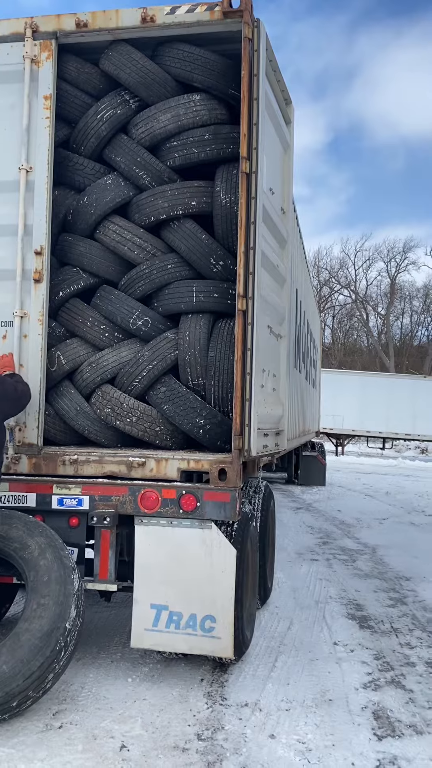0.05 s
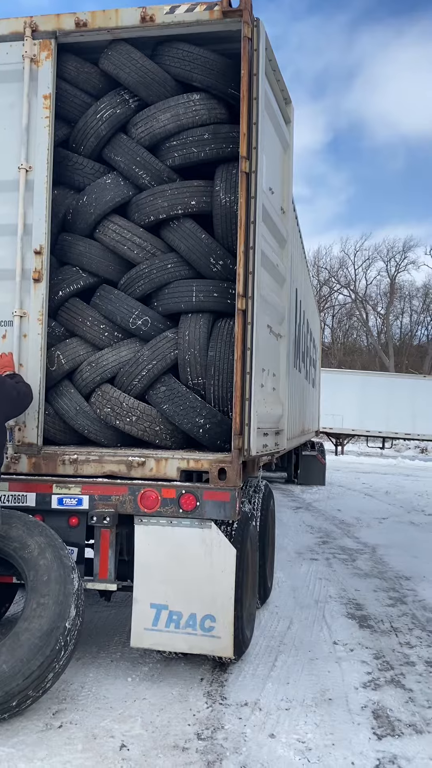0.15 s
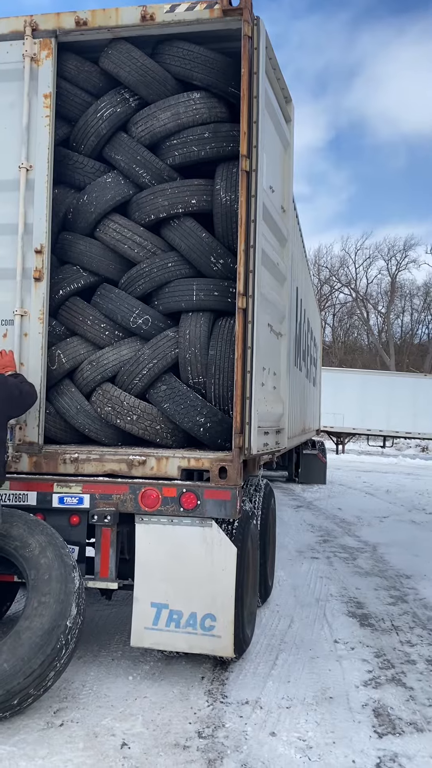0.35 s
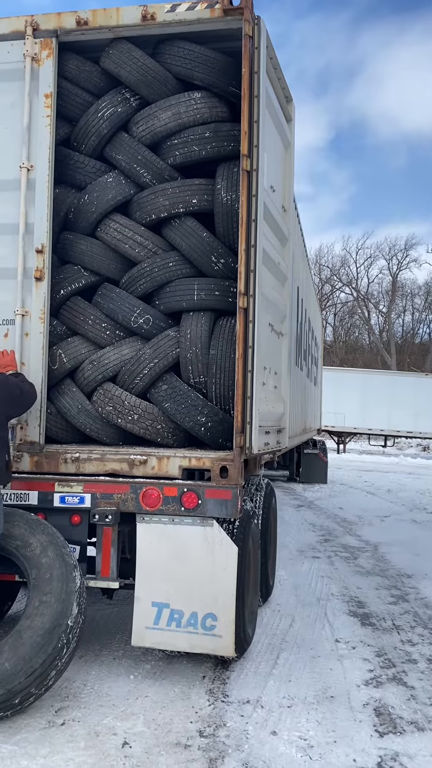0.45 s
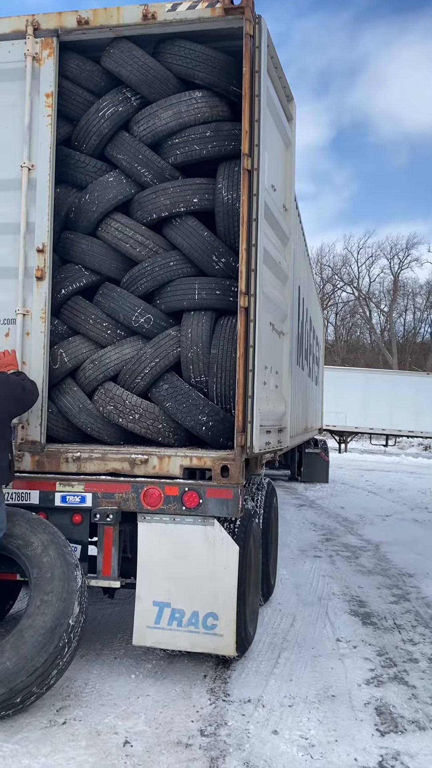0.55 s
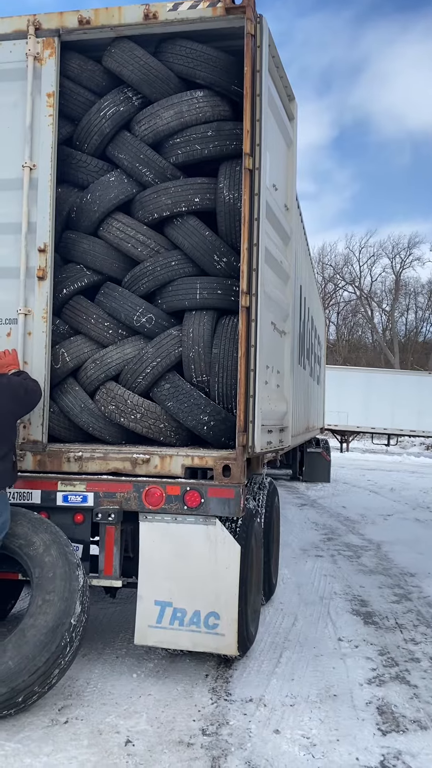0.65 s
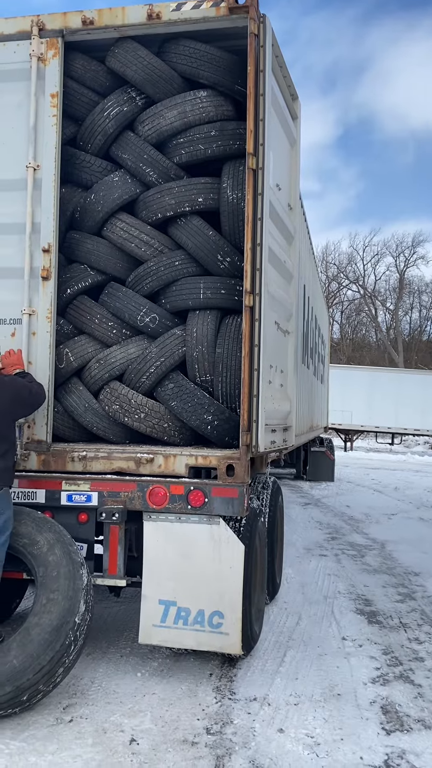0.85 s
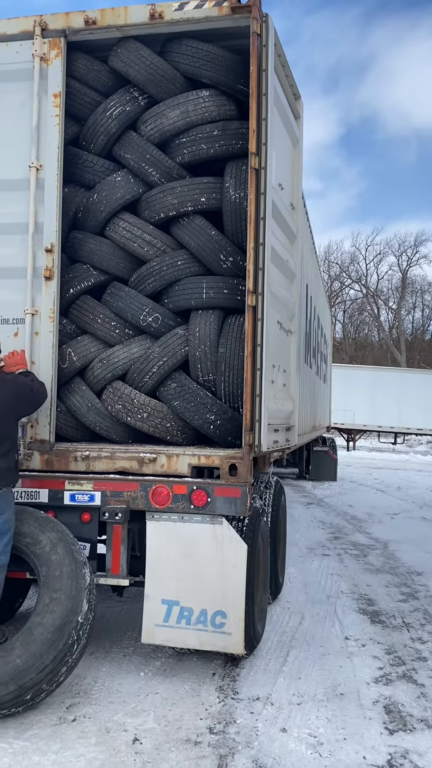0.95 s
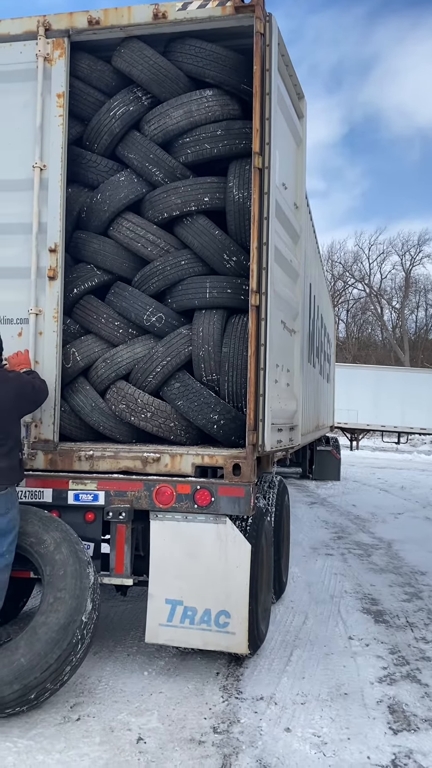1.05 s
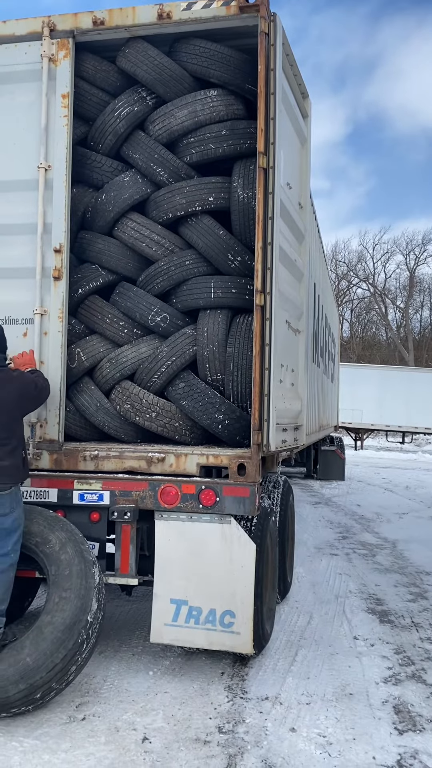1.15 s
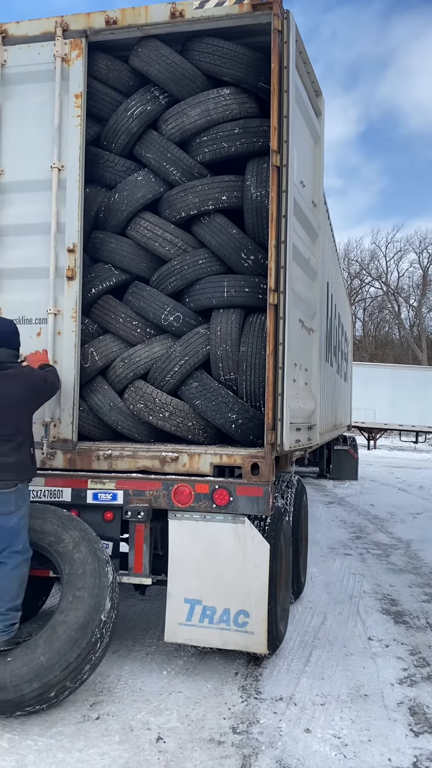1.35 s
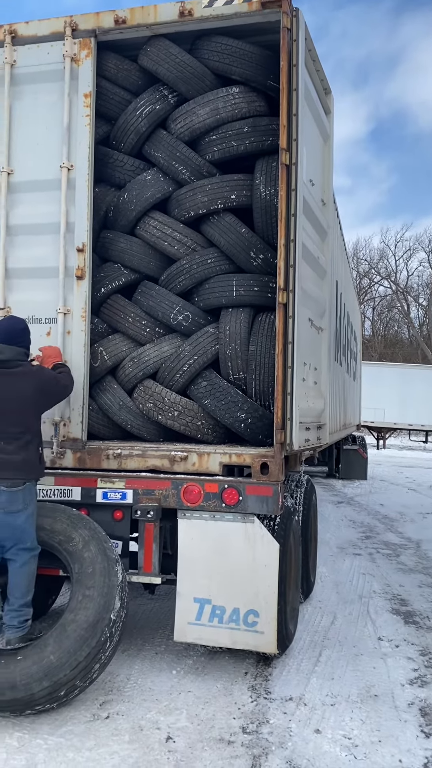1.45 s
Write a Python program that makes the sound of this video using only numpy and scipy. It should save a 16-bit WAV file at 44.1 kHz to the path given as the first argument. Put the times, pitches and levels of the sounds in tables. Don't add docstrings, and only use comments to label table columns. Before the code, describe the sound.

Heavy blows shake a large steel container: a crash, a weaker knock, then the loudest double bang with ringing panels. Wind rumbles and pops on a phone microphone in an open snowy yard, then faint crunching steps.

```python
import sys
import numpy as np
from scipy import signal
from scipy.fft import rfft, irfft
from scipy.io import wavfile
from scipy.ndimage import uniform_filter1d

SR = 44100
rng = np.random.default_rng(int(sys.argv[2]) if len(sys.argv) > 2 else 0)


def to_wav(s):
    ch = np.atleast_2d(s).T
    pcm = np.round(np.clip(ch, -1, 1) * 32767)
    wavfile.write(sys.argv[1], SR, pcm.astype(np.int16))


def attenuation_scalar(level_db):
    decades = np.asarray(level_db, float) / 20
    return 10 ** decades


N = 66150

HOP, HZ = 128, np.fft.rfftfreq(512, 1 / SR)
T = np.arange(N // HOP + 6) * HOP / SR

# (time [s], level [dB], hold [s], treble tilt [dB per octave])
BLOWS = [
    (0.22, -15.5, 0.032, -2.12),
    (0.418, -22.5, 0.023, -3),
    (0.697, -28.5, 0.0079, -11.5),
    (0.733, -14.5, 0.025, -1),
    (0.793, -18.5, 0.016, -2),
    (0.262, -30, 0.016, -0.5),
    (0.449, -33, 0.012, -1.5),
]
CRASH_TOP_HZ = 9800


def read(points, hz):
    f, value = np.transpose(points)
    return np.interp(np.log(hz + 1), np.log(f + 1), value)


def add(mix, s, sound):
    part = mix[:, max(round(s * SR), 0):][:, :sound.shape[1]]
    part += sound[:, :part.shape[1]]


def noise(gain, side, alike=.7, hop=HOP):
    a, b, c, d = rng.standard_normal((gain.shape[1], gain.shape[0], 4)).T
    hz = np.fft.rfftfreq(4 * hop, 1 / SR)
    alike = np.clip(alike, 0, 1)
    mid = a + 1j * b
    own = c + 1j * d
    across = alike * np.exp(1.9j) * mid + np.sqrt(1 - alike ** 2) * own
    across = across * attenuation_scalar(read(side, hz))[:, None]
    z = np.array([mid + across, mid - across]) * gain
    return signal.istft(z, nperseg=4 * hop, noverlap=3 * hop)[1][:, :N]


def colour(points, hz):
    g = attenuation_scalar(read(points, hz)) * (hz > 0)
    return (g / np.sqrt(np.sum(g ** 2)))[:, None]


def swell(t, hold, t60):
    rise_s = 0.01
    rise = np.clip(t / rise_s, 0, 1)
    return rise * attenuation_scalar(-60 * np.maximum(t - rise_s - hold, 0) / t60)


def puff(mix, s, db, hz, cycles, fall, ports):
    u = np.linspace(-2.5, 2.5, round(2.7 * cycles / hz * SR))
    turn = np.pi * cycles * (u - fall * u ** 2 / 5)
    shape = np.exp(-u ** 2) * np.cos(turn + rng.uniform(0, 2 * np.pi))
    sound = np.zeros((2, N))
    add(sound, s - len(u) / SR / 2, attenuation_scalar(db) * np.outer(ports, shape))
    return mix + sound


def crash():
    # (pitch [Hz], level [dB per Hz])
    crash_colour = [(88, -35.5), (150, -5.5), (364, -15), (438, -20), (736, -23), (1010, -27.5),
                    (1800, -29), (3480, -36), (5600, -41.5), (7700, -48.5), (12400, -58.5), (16200, -110),
                    (22000, -120)]
    # (pitch [Hz], side minus mid [dB])
    crash_side = [(110, -23.5), (190, -33), (350, -2.5), (1140, 4), (2050, -5), (3700, 4), (6660, -4.5),
                  (12000, 8)]
    # (pitch [Hz], t60 [s])
    crash_t60 = [(150, 0.6), (600, 0.4), (2000, 0.37), (5000, 0.21), (9000, 0.24)]
    bass_lag_s, full_hold_t60_s = 0.0087, .15
    yard_db, yard_t60_s = -25, 1.4
    notch_hz, notch_width_hz, notch_db = 4750, 130, -17

    hz = HZ[:, None]
    early = 1 + (hz / CRASH_TOP_HZ) ** 14
    t60 = read(crash_t60, hz) / early
    lag = bass_lag_s / (1 + (hz / 700) ** 2)
    power = np.zeros((len(HZ), len(T)))
    for s, db, hold, tilt_db in BLOWS:
        tilt = attenuation_scalar(db + tilt_db * np.log2(hz / 1000 + 0.21))
        t = T - s - lag
        direct = swell(t, hold * np.clip(t60 / full_hold_t60_s, 0, 1), t60)
        echo = attenuation_scalar(yard_db) * swell(t, hold / early, yard_t60_s / early ** 2)
        power += (tilt * direct) ** 2 + (tilt * echo) ** 2
    notch = attenuation_scalar(notch_db * np.exp(-((hz - notch_hz) / notch_width_hz) ** 2))
    return noise(np.sqrt(power) * colour(crash_colour, HZ) * notch, crash_side, alike=0.5)


def shimmer():
    # (pitch [Hz], level [dB per Hz])
    shimmer_colour = [(8000, -31.5), (10000, -2), (14000, -2), (15000, -6), (15900, -19), (16300, -58.5)]
    top = 0
    for s, db, hold, tilt_db in BLOWS:
        top = top + attenuation_scalar(db + 18 + 3 * tilt_db) * swell(T - s, hold, 0.31)
    return noise(top * attenuation_scalar(-73) * colour(shimmer_colour, HZ), [(8000, 22), (16000, 12)], alike=.3)


def steel_sheet(hz):
    ripple = uniform_filter1d(uniform_filter1d(rng.standard_normal(len(hz)), size=40), size=40)
    ripple_db = 2.5 * ripple / ripple.std() * (hz < CRASH_TOP_HZ)
    cepstrum = irfft(np.log(attenuation_scalar(ripple_db)))
    forward_only = np.r_[1, 2 * np.ones(N - 1), np.zeros(N)]
    return np.exp(rfft(cepstrum * forward_only))


def panels(hz):
    # (pitch [Hz], width [Hz], level [dB])
    resonances = [(348.7, 14, -6), (586, 28, -8.5), (753, 5.6, -7), (764.7, 38, -1.5), (760, 84, -17.5),
                  (893, 66, -15), (1060, 24, -26.5)]
    share = [-6.5, 7.5, -18, 0.3, 6.5, -8.5, -3]
    panel_db, panel_t60_s, side_db, wall_top_hz = -4.5, 0.26, -3, 1200

    power = np.zeros((len(HZ), len(T)))
    for (s, db, hold, _), share_db in zip(BLOWS, share):
        power += (attenuation_scalar(db + share_db + panel_db) * swell(T - s, hold, panel_t60_s)) ** 2
    shake = rfft(noise(np.sqrt(power), [(100, side_db), (1000, side_db)], alike=0.51), 2 * N)
    walls = 0
    for f, width, db in resonances:
        walls = walls + attenuation_scalar(db) * np.sqrt(width * 30) / (width + 2j * (hz - f))
    return shake * walls / (1 + 1j * hz / wall_top_hz) ** 2


def container():
    hz = np.fft.rfftfreq(2 * N, 1 / SR)
    dense = rfft(crash() + shimmer(), 2 * N) * steel_sheet(hz)
    return irfft(dense + panels(hz))[:, :N]


def buffeting(strength_db):
    # (pitch [Hz], level [dB per Hz])
    rumble_colour = [(20, -6), (55, 7.5), (110, 2.5), (170, 4.5), (240, -6), (350, -16), (700, -83)]
    # (pitch [Hz], side minus mid [dB])
    rumble_side = [(60, -56), (110, -46), (190, -33.5), (350, -11), (900, 1)]
    hop = 512
    hz = np.fft.rfftfreq(4 * hop, 1 / SR)
    steady = colour(rumble_colour, hz) * np.ones(N // hop + 6)
    rumble = noise(steady, rumble_side, alike=0.46, hop=hop)
    lumps = uniform_filter1d(uniform_filter1d(rng.standard_normal(N), 500), 500)
    return rumble * attenuation_scalar(strength_db - 4.5 + 3.5 * lumps / lumps.std())


def flutter(strength_db):
    per_s, spread_db, flutter_db = 450, 4.5, -20
    u = np.linspace(-2.5, 2.5, 401)
    out = np.zeros(N)
    for cycles in np.linspace(.9, 2.4, 6):
        size = attenuation_scalar(spread_db * np.minimum(rng.exponential(1, N), 3))
        size = size * rng.choice([-1, 1], N) * (rng.random(N) < per_s / 6 / SR)
        eddy = np.exp(-u ** 2) * np.sin(np.pi * cycles * u)
        out += signal.oaconvolve(size, eddy)[:N]
    return np.outer([1, -1], out / out.std() * attenuation_scalar(strength_db + flutter_db))


def eddies():
    # (centre time [s], peak level [dB], pitch [Hz])
    big_lumps = [(0.144, -14.5, 95), (0.249, -11, 123.2), (0.27, -7.5, 112), (0.298, -13, 115),
                 (0.334, -9, 104), (0.388, -10, 192), (0.426, -12, 59.4), (0.482, -9, 79.3),
                 (0.528, -7.5, 79.2), (0.547, -7.5, 98), (0.573, -12.5, 97.6), (0.604, -13.5, 102),
                 (0.623, -4, 118), (0.645, -5, 163.7), (0.652, -3, 69.4), (0.69, -2.5, 118.2),
                 (0.713, -6, 152), (0.726, -12, 155.5), (0.77, -6, 171.7), (0.782, -7.5, 132.6),
                 (0.787, -6, 59.9), (0.799, -10, 120.7), (0.839, -2.5, 61.6), (0.887, -4, 111.4),
                 (0.911, -4, 63), (0.975, -17.5, 91.4), (1.1, -13.5, 148), (1.128, -12, 172)]
    # (centre time [s], peak level [dB], pitch [Hz], snap level [dB])
    pops = [(0.55, -6, 285, -6.5), (0.574, -26.5, 796, -23), (.588, -28, 787, -18), (0.717, -26, 504, -7),
            (0.888, -4, 413, -37.5), (1.019, -18.5, 620, -30), (1.031, -28.5, 580, -18.5),
            (1.051, -19, 287, -22.5), (1.088, -11.5, 482, -44), (1.097, -12, 455, -13.5),
            (1.111, -15, 380, -6.5), (1.128, -19, 380, -7.5), (1.142, -20, 583, -15),
            (1.155, -16.5, 290, -15.5), (1.137, -21, 500, -13), (1.2, -22.5, 377, -20),
            (1.218, -8.5, 552, -16), (1.299, -29.5, 500, -10), (1.314, -28.5, 136, -38),
            (1.374, -25.5, 312, -33), (.529, -20.5, 564, -31), (.541, -24.5, 600, -22),
            (.202, -22.5, 150, -24), (1.0, -18, 259, -33.5), (1.029, -16.5, 262, -32), (1.03, -20, 70, -39),
            (1.185, -20.5, 60, -39), (1.239, -23.5, 80, -35), (1.312, -24, 70, -37),
            (0.386, -20.5, 60, -41), (0.304, -19, 60, -40.5)]
    # (centre time [s], peak
    # level [dB], pitch [Hz])
    cross_pushes = [(.625, -9, 575), (.64, -13, 314), (.25, -11, 550), (0.26, -13, 527), (0.275, -25, 497),
                    (0.446, -12, 449), (.464, -18, 500), (.474, -35, 367), (0.494, -17, 399),
                    (.525, -14, 454), (0.559, -20, 400), (.578, -20, 407), (0.591, -16.5, 420),
                    (0.714, -15, 288), (0.733, -9.5, 360), (.875, -5, 503), (0.905, -7, 560),
                    (.97, -29, 600), (1.03, -22.5, 715), (1.131, -25, 200), (1.217, -26.5, 650),
                    (1.314, -27, 167), (1.33, -31, 800)]
    # (centre time [s], peak level [dB], pitch [Hz])
    hoots = [(.578, -24, 428), (.595, -28, 386), (.624, -36, 573), (.64, -37.5, 540), (.655, -39, 502),
             (.68, -29, 437), (.697, -27.5, 574), (.706, -33, 613), (.723, -21.5, 610), (.752, -16, 773),
             (.807, -20, 800), (.83, -26.5, 840), (1.142, -42.5, 1670), (1.217, -40, 2040),
             (1.104, -25, 700), (1.12, -29, 620), (1.147, -32.5, 440), (1.008, -26, 473), (1.305, -34, 333),
             (.765, -11, 800)]
    together, apart = [1, 1], [1, -1]

    out = np.zeros((2, N))
    for s, db, pitch_hz in big_lumps:
        out = puff(out, s, db - 1.5, pitch_hz, 2.18, 1, together)
    for s, db, pitch_hz, snap_db in pops:
        out = puff(out, s, db, pitch_hz, 1.65, 1, together)
        out = puff(out, s - .0012, db + snap_db, pitch_hz * 1.99, 1.65, 1, together)
    for s, db, pitch_hz in cross_pushes:
        out = puff(out, s, db, pitch_hz, 1.7, 0, apart)
    for s, db, pitch_hz in hoots:
        out = puff(out, s, db, pitch_hz, 4.5, 0, together)
    return out


def wind():
    # (time [s], level [dB])
    gust = [(0.0, -22.5), (0.1, -31.5), (0.184, -36), (0.24, -26), (0.344, -15.5), (0.361, -25.5),
            (0.552, -12.5), (0.7, -9.5), (0.773, -10.5), (0.92, -16.5), (0.942, -18), (1.135, -17),
            (1.199, -24), (1.249, -23), (1.274, -43), (1.312, -22.5), (1.4, -34), (1.5, -33.5)]
    strength_db = np.interp(np.arange(N) / SR, *np.transpose(gust))
    return buffeting(strength_db) + flutter(strength_db) + eddies()


def squeak():
    start_s, length_s, pitch_hz = 1.365, .075, 8250
    u = np.clip((np.arange(N) / SR - start_s) / length_s, 0, 1)
    wobble_hz = 900 * uniform_filter1d(rng.standard_normal(N), 120)
    cycles = np.cumsum(pitch_hz + wobble_hz) / SR
    tone = attenuation_scalar(-72) * np.sin(np.pi * u ** .6) * np.sin(2 * np.pi * cycles)
    return tone * attenuation_scalar(np.array([[1.5], [-1.5]]))


def snow():
    # (time [s], level [dB], length [s])
    steps = [
        (-.01, -58.5, 0.0027),
        (0.366, -57.5, 0.014),
        (0.668, -65, 0.016),
        (0.995, -49.5, 0.012),
        (1.037, -54.5, 0.016),
        (1.111, -55.5, 0.0042),
        (1.241, -55.5, 0.038),
        (1.338, -55.5, 0.059),
        (1.421, -60.5, 0.039),
        (1.474, -56.5, .02),
    ]
    # (pitch [Hz], level [dB per Hz])
    snow_colour = [(1500, 9.5), (3200, 3.5), (4700, -7), (5800, 0), (8500, -13.5), (11500, -17),
                   (15000, -26), (16000, -47.5)]
    level = 0
    for s, db, length in steps:
        rise = np.clip((T - s) / 0.004, 0, 1)
        fall = attenuation_scalar(-200 * np.maximum(T - s - length, 0) / 0.51)
        level = level + attenuation_scalar(db) * rise * fall
    grains = attenuation_scalar(2.66 * uniform_filter1d(rng.standard_normal((len(T), len(HZ))), 25, 1).T)
    side = [(2000, -1), (8000, -0.5), (12000, 11.5)]
    return noise(level * grains * colour(snow_colour, HZ), side, alike=0.44) + squeak()


def yard():
    # (pitch [Hz], level [dB per Hz])
    hum_colour = [(150, -9.5), (250, -25.5), (450, -24.5), (800, -22), (1100, -27.5), (1500, -33),
                  (5000, -61), (12400, -71.5), (14500, -81), (15500, -100)]
    # (pitch [Hz], side minus mid [dB])
    hum_side = [(150, -35.5), (350, -25), (650, -0.5), (1200, 6), (3000, 0.5), (9000, 5)]
    hum_db, drone_db, drone_top_hz = -43.5, 16, 380
    patches = rng.standard_normal((len(T), len(HZ)))
    patches = uniform_filter1d(uniform_filter1d(patches, 12, 0), 5, 1).T
    drone = attenuation_scalar(drone_db * np.outer(HZ < drone_top_hz, np.clip(1 - T, 0, 1)))
    hum = colour(hum_colour, HZ) * (HZ > 120)[:, None] * attenuation_scalar(hum_db + 0.37 * patches / patches.std())
    return noise(drone * hum, hum_side, alike=.5)


def scene():
    return container() + wind() + snow() + yard()


def roll_off(x):
    return signal.sosfilt(signal.butter(12, 15800, fs=SR, output="sos"), x)


def record(dry):
    duck_from_db, duck_share, recover_db_per_s = -11, 0.96, 90
    bass = signal.sosfiltfilt(signal.butter(4, 330, fs=SR, output="sos"), dry)
    power_db = 10 * np.log10(abs(uniform_filter1d((bass ** 2).mean(0), 900)) + 1e-12)
    fall = np.arange(N) * recover_db_per_s / SR
    held_db = np.maximum.accumulate(power_db + fall) - fall
    over_db = uniform_filter1d(np.maximum(held_db - duck_from_db, 0), 400)
    x = bass + (dry - bass) * attenuation_scalar(-duck_share * over_db)
    x = signal.sosfilt(signal.butter(2, 44, "high", fs=SR, output="sos"), x)

    side = signal.sosfilt(signal.butter(4, 72, "high", fs=SR, output="sos"), (x[0] - x[1]) / 2)
    mid = signal.sosfiltfilt(signal.ellip(8, .2, 60, 12450, fs=SR, output="sos"), x.mean(0))
    hiss_band = signal.butter(4, [11800, 12300], "band", fs=SR, output="sos")
    hiss = signal.sosfilt(hiss_band, rng.standard_normal(N))
    mid = mid + hiss / hiss.std() * attenuation_scalar(-86 + .8 * over_db)
    x = mid + np.outer([1, -1], side)
    ceiling = 1.3
    return roll_off(ceiling * np.tanh(x / ceiling))


dry = scene()
out = record(dry)
to_wav(out)
```